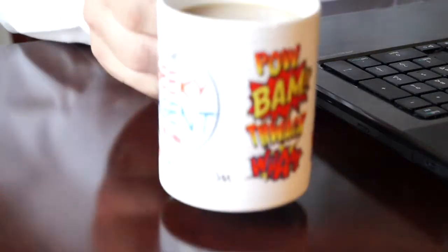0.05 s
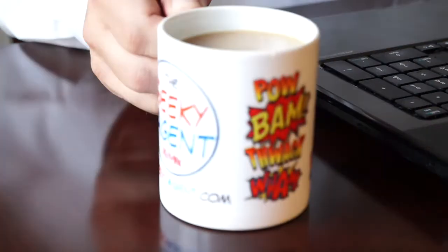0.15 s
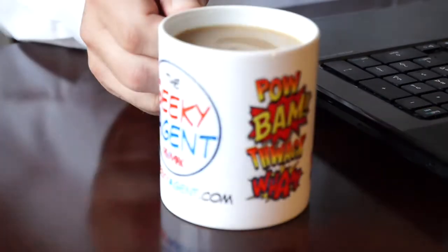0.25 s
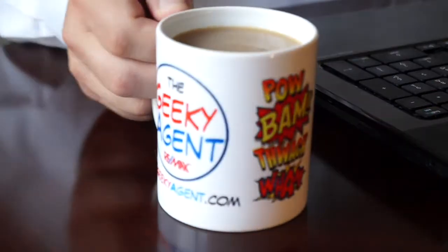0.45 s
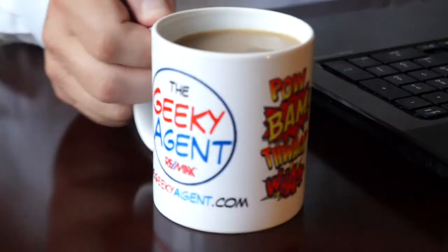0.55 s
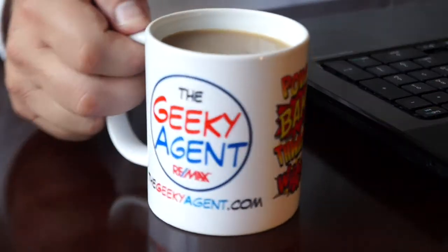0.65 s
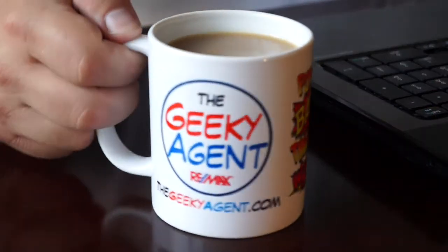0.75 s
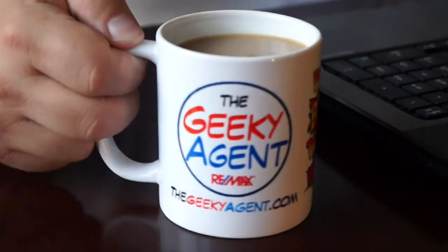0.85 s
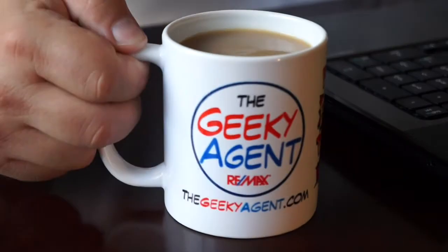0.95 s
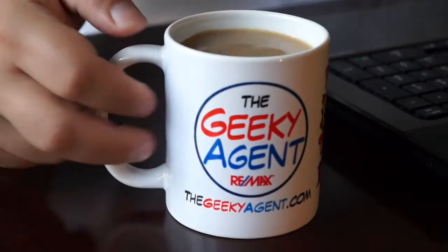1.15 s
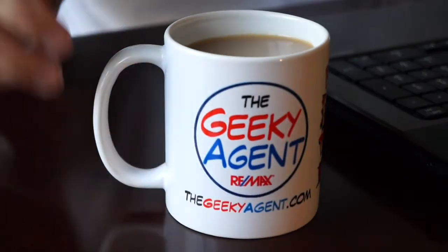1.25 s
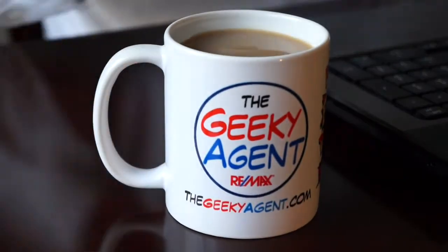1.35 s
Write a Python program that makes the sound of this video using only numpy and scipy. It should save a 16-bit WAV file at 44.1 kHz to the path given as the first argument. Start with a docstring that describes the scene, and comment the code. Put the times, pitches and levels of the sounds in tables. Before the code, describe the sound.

A full ceramic mug thumps down hard on a wooden desk, then scrapes and clicks as it turns

```python
"""A full ceramic mug is set down hard on a wooden desk: a thump of shaped noise and ringing tones, then a boom.
Next it is turned by its handle. Its foot rubs over the wood, made of tiny random slips through filters,
and catches with small sharp clicks of fast-fading noise, the last as the hand lets go.
Room hum, hiss and a faint whine run throughout, made of filtered noise. An automatic gain control
ducks everything under the thump and slowly lets the background return."""
import sys
import numpy as np
from scipy import signal
from scipy.fft import rfft, irfft
from scipy.io import wavfile
from scipy.ndimage import uniform_filter1d, minimum_filter1d

SR = 44100
rng = np.random.default_rng(int(sys.argv[2]) if len(sys.argv) > 2 else 0)


def store_pcm(level_fs):
    """Save levels as 16-bit WAV."""
    pcm = np.round(np.clip(level_fs, -1, 1) * 32767).astype(np.int16)
    wavfile.write(sys.argv[1], SR, np.atleast_2d(pcm).T)


N = 61740
T = np.arange(N) / SR  # time of each sample in seconds

# the mug lands and settles: [start_s, level_db before KNOCK_DB is added]
LANDINGS = [(0.2085, 1.5), (.2140, -10), (0.2327, -10.5), (0.2947, -15.5)]
# tone colour of the dense knock of mug and wood: [pitch_hz, relative_level_db]
KNOCK_COLOUR = [(30, -24), (55, -10.5), (80, -30.5), (180, -9), (450, -1.5), (900, -3), (1300, -2.5),
                (1700, -5.5), (2200, -11.5), (3100, -18), (4500, -27), (6000, -31), (8000, -32),
                (10500, -48.5), (16000, -74)]
# ringing of the desk top: [pitch_hz, level_db before DESK_DB is added, time_to_fall_60_db_s]
DESK_RING = [(120.1, -13, 0.66), (185.5, 1.5, 0.17), (222.8, -2.5, 0.43), (334.8, 0, 0.44),
             (363.3, -3.5, 0.41), (379.7, -6.5, 0.39), (482.5, 2, 0.3), (534.8, 5.5, 0.31),
             (562.4, -3.5, 0.4), (679.6, -1.5, 0.36), (759, -1, 0.53), (880, -0.5, 0.24), (1344, -3, 0.46),
             (1610, 2, .18)]
# tone colour of a low wooden knock, also used by the clicks: [pitch_hz, relative_level_db]
WOOD_COLOUR = [(60, -21), (350, 1), (1300, -5.5), (2800, -2.5), (5000, -8), (12000, -29.5)]
KNOCK_DB, KNOCK_T60_S, KNOCK_ROOM_DB = 31, 0.049, 3
KNOCK_WIDTH_DB = -5  # narrows the stereo picture
PUSH_DB = 27
CRACK_DB, CRACK_T60_S = 14, 0.0025
DESK_DB, DESK_ATTACK_S = -1, 0.0054


def thump():
    """The foot lands on one edge, then settles: a hard push and crack, a dense knock and the desk's ring."""
    first = LANDINGS[0][0]
    knock = sum(amp(KNOCK_DB + db) * contact(s, KNOCK_T60_S, KNOCK_ROOM_DB, ROOM) for s, db in LANDINGS)
    centre = knock.mean(axis=0)
    knock = centre + amp(KNOCK_WIDTH_DB) * (knock - centre)
    push = amp(PUSH_DB) * (np.arange(N) == round(first * SR))  # a single sample
    crack = amp(CRACK_DB) * coloured(burst(first, CRACK_T60_S), WOOD_COLOUR)
    t = np.maximum(T - first, 0)
    ring = 0
    for hz, db, t60 in DESK_RING:
        tone = np.sin(2 * np.pi * (hz * t + rng.random()))  # random starting point in the wave
        ring = ring + amp(db) * fade(t, t60) * tone
    ring = amp(DESK_DB) * ring * (1 - np.exp(-t / DESK_ATTACK_S))
    return coloured(push + knock, KNOCK_COLOUR) + crack + ring


# deep boom of the desk, swelling after the blow: [time_s, level_db]
BOOM = [(.21, -36), (.25, -28), (.36, -22.5), (.45, -35), (.52, -51), (.6, -60.5)]
BOOM_HZ, BOOM_WIDTH_HZ = 114.5, 24  # width of one filter pass; two are used


def boom():
    """The desk's lowest resonance rumbles on under the knock, as noise in a narrow band."""
    rumble = filtered(rng.standard_normal(N), lambda f: band(f, BOOM_HZ, BOOM_WIDTH_HZ) ** 2)
    return unit(rumble) * level(BOOM)


SLIPS_PER_S, SLIP_SPREAD_DB = 900, 3.5  # average rate, and how much their strengths vary


def slips():
    """The mug's foot makes tiny slips at irregular times, pushing randomly either way."""
    happens = rng.random(N) < SLIPS_PER_S / SR
    direction = rng.choice([-1, 1], N)
    strength = amp(SLIP_SPREAD_DB * rng.standard_normal(N))
    return unit(happens * direction * strength)


# loudness of the foot rubbing on the wood: [time_s, level_db]
RUB = [(.5, -40), (.62, -41.5), (.72, -35), (.81, -39), (.88, -37), (1.0, -41), (1.12, -40), (1.19, -45),
       (1.25, -49), (1.3, -68), (1.4, -74)]
# tone colour of the rubbing: [pitch_hz, relative_level_db]
RUB_COLOUR = [(40, -36), (150, -10), (300, 4), (550, 0), (750, 0.5), (1200, -0.5), (1800, -5.5),
              (2600, -11.5), (5000, -17.5), (8000, -14.5), (11000, -43), (16000, -50)]
RUB_ROOM_DB = 8


def rasp():
    """Slips rasp over the wood and are heard mostly through the room's answer."""
    rub = unit(coloured(slips(), RUB_COLOUR)) * level(RUB)
    # divide so the added room sound does not raise the overall level
    return in_room(rub, RUB_ROOM_DB) / np.hypot(1, amp(RUB_ROOM_DB))


# low chatter of the desk under the turning mug: [time_s, level_db]
CHATTER = [(.6, -52), (.73, -43.5), (.82, -40), (.92, -51), (1.0, -38), (1.045, -49), (1.105, -40),
           (1.16, -40), (1.2, -55), (1.235, -37), (1.26, -49), (1.285, -43), (1.32, -48), (1.4, -68)]
# resonances of the chatter: [pitch_hz, width_hz, relative_level_db]
CHATTER_MODES = [(120.4, 8.2, -13), (273, 11.4, -3), (354, 11.3, 1.5), (535, 26, -6)]


def chatter():
    """Slips shake the desk's low resonances."""
    def desk(f):
        """The desk's resonances added together."""
        return sum(amp(db) * band(f, hz, width) for hz, width, db in CHATTER_MODES)
    return unit(filtered(slips(), desk)) * level(CHATTER)


# a short hissing skid: [time_s, level_db before SKID_DB is added]
SKID = [(.68, -60), (.712, -50), (.727, -34), (.745, -43.5), (.79, -64)]
SKID_DB = -1
SKID_HZ, SKID_WIDTH_HZ = 4980, 1450  # width of one filter pass; two are used


def skid():
    """The foot skids once: slips filtered to a high band give a short hiss."""
    hiss = unit(filtered(slips(), lambda f: band(f, SKID_HZ, SKID_WIDTH_HZ) ** 2))
    hiss = hiss * level(SKID) * (T < SKID[-1][0])
    return amp(SKID_DB) * in_room(hiss, CLICK_ROOM_DB)


# catches of the foot: [start_s, level_db, time_to_fall_60_db_s, low_knock_db relative to level_db]
# CLICK_DB is added to the bright snaps and CLICK_BODY_DB to the low knocks
CLICKS = [(0.6358, -28.5, 0.0163, 18), (0.6908, -23.5, .015, 14), (0.7968, -5.5, 0.033, 1.5),
          (0.8071, -2, 0.059, -10), (.903, -11, 0.036, -1), (0.9072, -2, 0.052, -13),
          (0.9233, -8, 0.065, -13), (1.0195, -10.5, 0.039, 0.5), (1.1264, 3, 0.0032, -24),
          (1.1271, 1.5, 0.0014, -50), (1.1355, -8, .008, -32), (1.138, -12, 0.0034, -22)]
# tone colour of the bright snap: [pitch_hz, relative_level_db]
SNAP_COLOUR = [(200, -27), (2300, -32), (3200, -11.5), (4500, -11), (5700, -8), (7000, -1.5), (8500, -3),
               (10000, -13.5), (13000, -25), (16000, -32)]
CLICK_DB, CLICK_BODY_DB = -4.5, -5
CLICK_ROOM_DB, CLICK_ROOM_T60_S = -4.5, .32


def clicks():
    """Each catch mixes a bright snap and a wooden knock: the first two mostly knock, most later ones snap."""
    snaps, knocks = 0, 0
    for s, db, t60, knock_db in CLICKS:
        # one decay time for the snap's tail at every pitch
        snaps = snaps + amp(db) * contact(s, t60, CLICK_ROOM_DB, [(1, CLICK_ROOM_T60_S)])
        knocks = knocks + amp(db + knock_db) * contact(s, t60, KNOCK_ROOM_DB, ROOM)
    snaps = amp(CLICK_DB) * coloured(snaps, SNAP_COLOUR)
    return snaps + amp(CLICK_BODY_DB) * coloured(knocks, WOOD_COLOUR)


# tone colour of the room hum and hiss: [pitch_hz, relative_level_db]
FLOOR = [(20, -7), (60, -1.5), (180, -3.5), (350, -2), (600, -11), (1200, -18.5), (2500, -24.5),
         (7000, -26), (11000, -30), (15000, -34), (16500, -61)]
# steady hums and whines: [pitch_hz, width_hz of one filter pass (two are used), level_db]
HUMS = [(126, 8.7, -60), (307.8, 6.8, -55.5), (7800, 72, -67), (13050, 700, -61.5)]
FLOOR_DB = -46.5


def background():
    """Room hum, hiss and a thin electrical whine, all from steady filtered noise."""
    air = unit(spread(coloured(rng.standard_normal((2, N)), FLOOR)))
    hums = 0
    for hz, width, db in HUMS:
        hum = filtered(rng.standard_normal(N), lambda f: abs(band(f, hz, width)) ** 2)
        hums = hums + amp(db) * unit(hum)
    return amp(FLOOR_DB) * air + hums


# how long the room rings: [pitch_hz, time_to_fall_60_db_s]
ROOM = [(60, 0.87), (150, 0.51), (400, 0.45), (1000, 0.62), (2500, 0.52), (7000, 0.57), (14000, 0.48)]
ROOM_BUILD_S = 0.0013


def room_tail(decays):
    """Noise fading at its own speed at each pitch: the room's many echoes, left channel energy 1."""
    hz, t, z = signal.stft(rng.standard_normal((2, N)), SR, nperseg=256)
    z = z * fade(t, along(decays, hz)[:, None])
    tail = signal.istft(z, SR, nperseg=256)[1][:, :N]
    tail = spread(tail * (1 - np.exp(-T / ROOM_BUILD_S)))
    return tail / np.linalg.norm(tail[0])


def in_room(x, wet_db):
    """The direct sound plus the room's answer."""
    answer = signal.fftconvolve(x[None], room_tail(ROOM), axes=1)[:, :N]
    return x + amp(wet_db) * answer


# side level compared with the centre: narrow in the bass, with a dip near 6 kHz: [pitch_hz, level_db]
WIDTH = [(100, -14.5), (300, -11), (500, -8.5), (1000, -9), (2000, -7), (4000, -9), (6000, -14),
         (8500, -10), (12000, -15)]


def spread(pair):
    """Two unrelated signals become the centre and side of a stereo sound."""
    side = filtered(pair[1], lambda f: amp(along(WIDTH, f)))
    return np.array([pair[0] + side, pair[0] - side])


GRAINS_PER_S, GRAIN_BED = 5000, .3  # average contact rate, and steady noise between contacts


def burst(s, t60):
    """A dying rattle of micro-contacts, energy 1."""
    grains = GRAIN_BED + (rng.random(N) < GRAINS_PER_S / SR)
    x = rng.standard_normal(N) * grains * fade(T - s, t60)
    return x / np.linalg.norm(x)


def contact(s, t60, wet_db, decays):
    """One contact: its short rattle plus a diffuse tail starting with it."""
    tail = np.pad(room_tail(decays), ((0, 0), (round(s * SR), 0)))[:, :N]
    return burst(s, t60) + amp(wet_db) * tail


def amp(db):
    """Decibels to gain."""
    return 10 ** (np.asarray(db) / 20)


def unit(x):
    """Scale to an average (rms) strength of 1."""
    return x / np.sqrt(np.mean(x ** 2) + 1e-20)


def along(points, hz):
    """Read a value at any pitch between (Hz, value) points, on a log pitch axis."""
    f, v = np.transpose(points)
    return np.interp(np.log(hz + 1), np.log(f + 1), v)


def level(rows):
    """Gain per sample from (s, dB) points, practically silent before the first."""
    s, db = np.transpose(rows)
    return amp(np.interp(T, s, db, left=-120))


def fade(t, t60):
    """Exponential decay from t = 0, falling 60 dB in t60 seconds."""
    return (t >= 0) * amp(-60 * np.maximum(t, 0) / t60)


def filtered(x, response):
    """Change the strength of each pitch in x by a response of frequency."""
    return irfft(rfft(x, 2 * N) * response(np.fft.rfftfreq(2 * N, 1 / SR)))[..., :N]


def coloured(x, points):
    """Filter of unit power through (Hz, dB) points that never sounds before its input."""
    gain = unit(amp(along(points, np.fft.rfftfreq(2 * N, 1 / SR))))
    # fold the cepstrum forward in time: the minimum-phase filter
    cep = irfft(np.log(gain))
    cep[1:N] *= 2
    cep[N + 1:] = 0
    return filtered(x, lambda f: np.exp(rfft(cep)))


def band(f, hz, width):
    """One resonance: strongest at hz, weaker on both sides."""
    return 1j * f * width / (hz * hz - f * f + 1j * f * width)


def scene():
    """The mug lands and is turned in the humming room."""
    turning = rasp() + skid() + chatter()
    return thump() + boom() + turning + clicks() + background()


LIMIT_DB, DETECT_S = -8, 0.015  # level where ducking starts, and the averaging time
LOOKAHEAD_S, HOLD_S, RELEASE_DB_PER_S = 0.0115, 0.051, 28
CEILING, TOP_HZ = 0.92, 16400


def record(dry):
    """Look-ahead gain control with hold and slow release, soft clipping, then a treble cutoff."""
    power = abs(uniform_filter1d(np.mean(dry ** 2, axis=0), int(DETECT_S * SR))) + 1e-12
    over_db = np.maximum(10 * np.log10(power) - LIMIT_DB, 0)
    hold = int(HOLD_S * SR)
    # keep the largest recent overshoot
    held = -minimum_filter1d(-over_db, hold, origin=(hold - 1) // 2)
    # let the gain cut shrink no faster than the release speed
    release = RELEASE_DB_PER_S * T
    cut_db = np.maximum.accumulate(held + release) - release
    x = dry * amp(-np.interp(T + LOOKAHEAD_S, T, cut_db))
    x = x / (1 + abs(x / CEILING) ** 8) ** (1 / 8)  # soft clipping
    return filtered(x, lambda f: f < TOP_HZ)


dry = scene()
out = record(dry)
store_pcm(out)
```